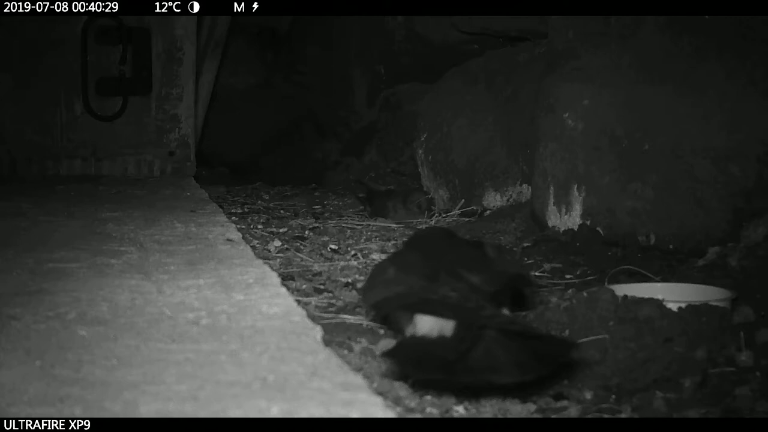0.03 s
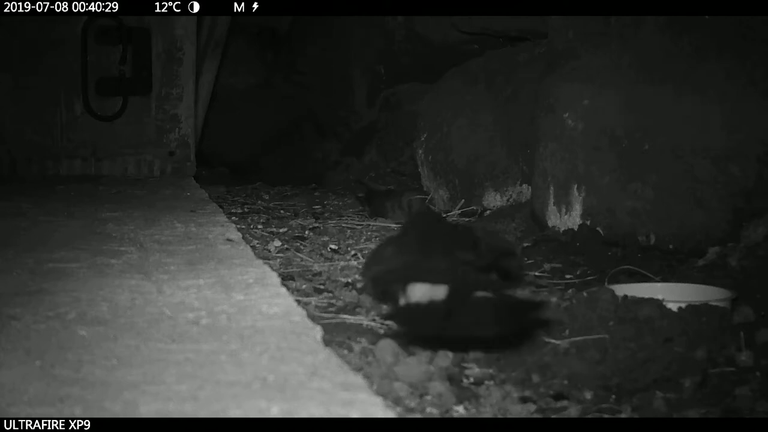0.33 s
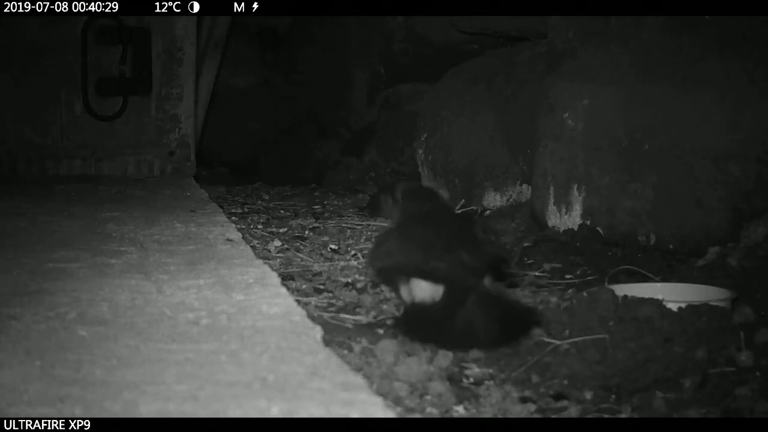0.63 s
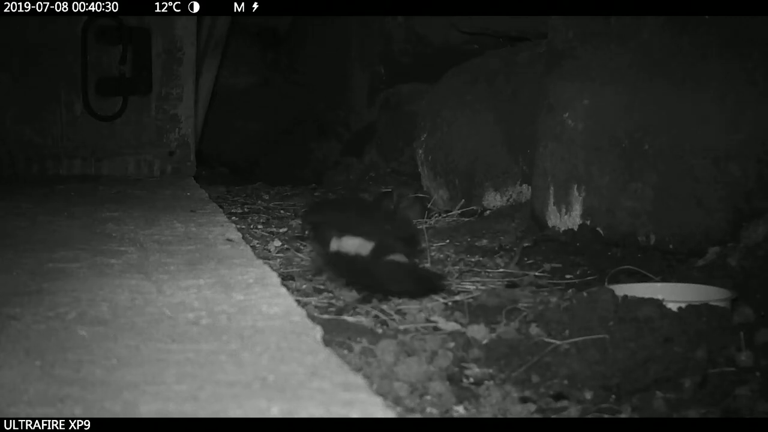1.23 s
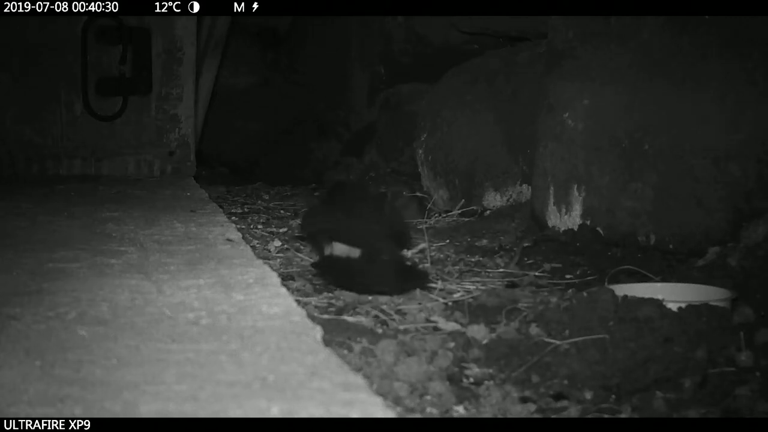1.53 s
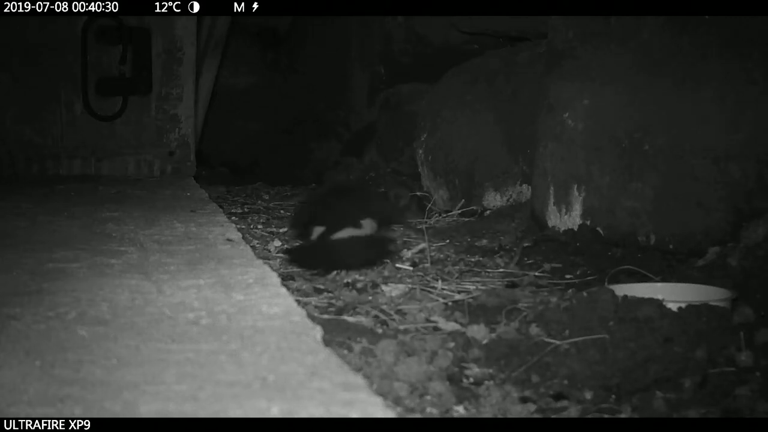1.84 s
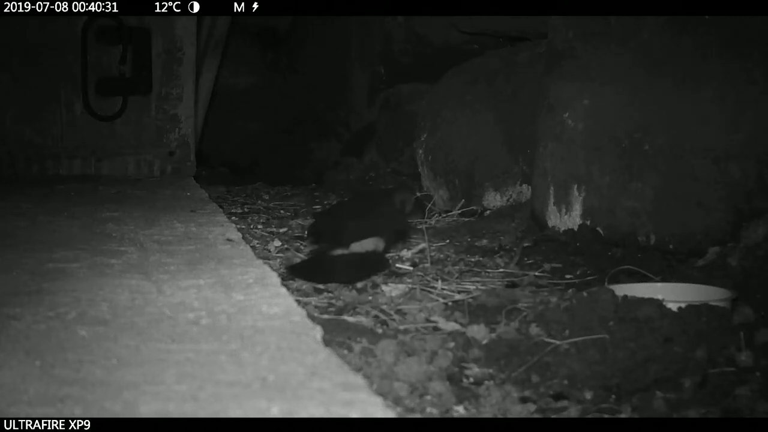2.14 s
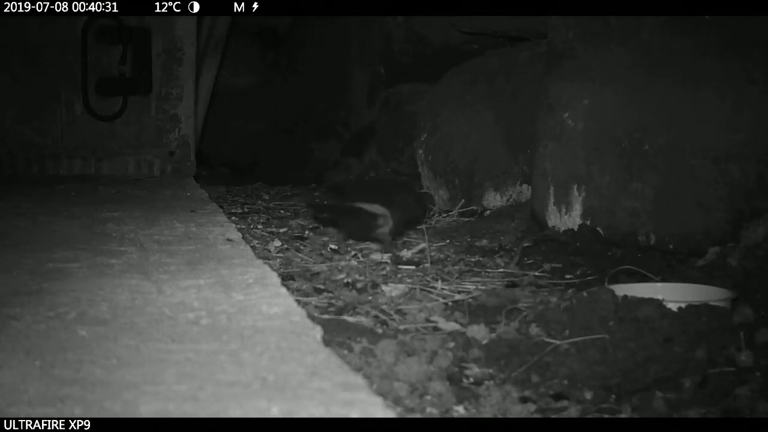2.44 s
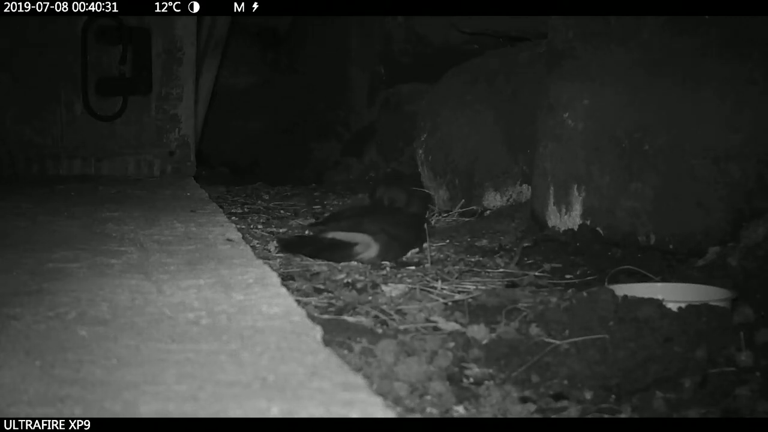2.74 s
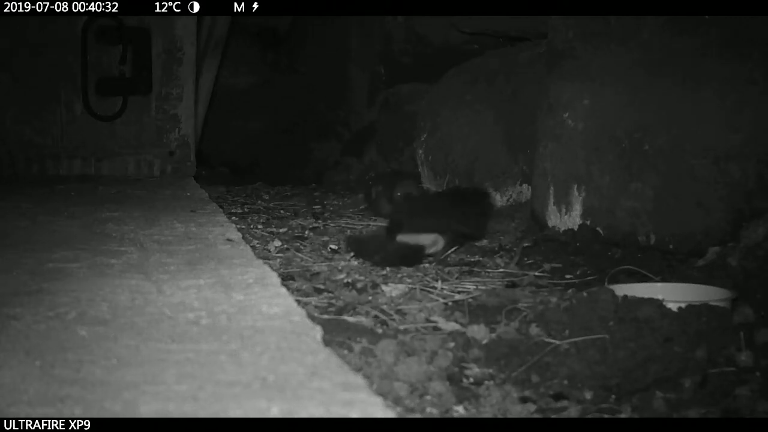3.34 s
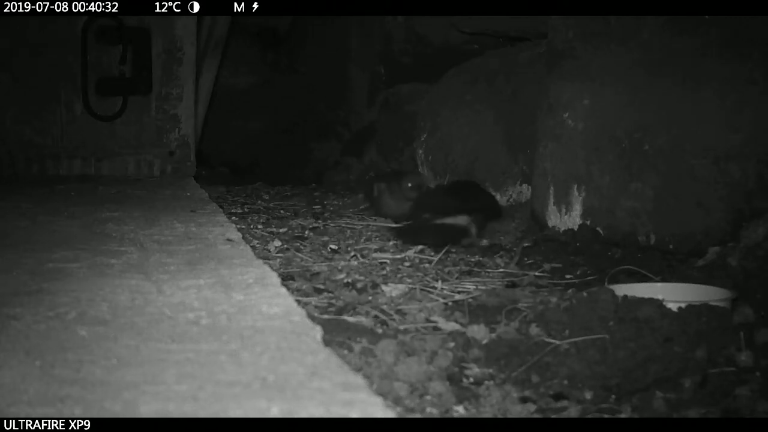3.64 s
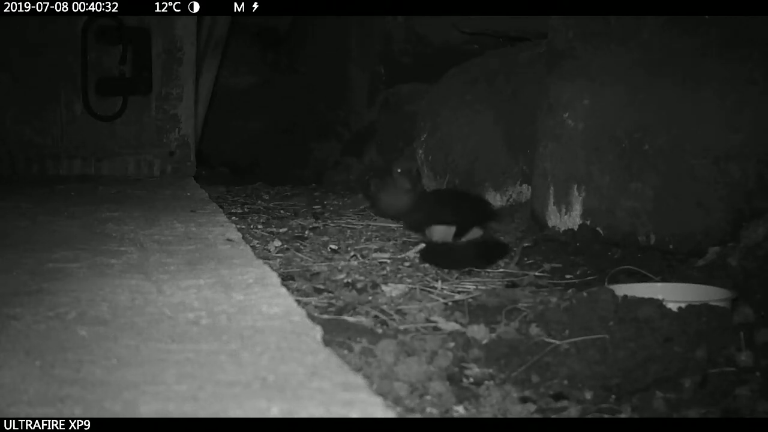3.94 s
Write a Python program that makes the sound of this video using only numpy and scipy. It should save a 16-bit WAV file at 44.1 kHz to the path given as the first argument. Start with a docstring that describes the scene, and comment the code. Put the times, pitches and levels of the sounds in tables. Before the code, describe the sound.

A seabird purrs in a rapid trill a few steps away, starting almost at once. At about 0.9, 2.4 and 3.9 seconds the purr ends in a hiccup, a clean squeak breaking into a low wheeze, and resumes straight after the first two. A second bird wheezes faintly near 1.2 and 3.8 seconds. A stone wall adds a short echo over steady faint hiss and soft low bumps.

```python
"""A storm petrel purrs on the ground by a stone wall at night, a few steps away.
Each purr is a run of tiny notes, each a quick arch of pitch, pulsed by the syrinx and rung in the throat.
It ends in a hiccup: a clean squeak that breaks into a low, falling wheeze.
A second bird wheezes further off. The stones give a short echo over hiss and soft low bumps."""
import sys
import numpy as np
from scipy import signal
from scipy.fft import rfft, irfft
from scipy.io import wavfile
from scipy.ndimage import uniform_filter1d

SR = 44100
rng = np.random.default_rng(int(sys.argv[2]) if len(sys.argv) > 2 else 0)


def store_pcm(level_fs):
    """Save levels as 16-bit WAV."""
    pcm = np.round(np.clip(level_fs, -1, 1) * 32767).astype(np.int16)
    wavfile.write(sys.argv[1], SR, np.atleast_2d(pcm).T)


N = 176400
T = np.arange(N) / SR


def amp(db):
    """Decibels to gain."""
    return 10 ** (np.asarray(db) / 20)


def unit(x):
    """Scale to an rms of 1."""
    return x / np.sqrt(np.mean(x ** 2))


def curves(rows, t):
    """Read a table as automation: the first column is time, each other one a curve at times t."""
    rows = np.array(rows, float)
    return [np.interp(t, rows[:, 0], column) for column in rows.T[1:]]


def span(rows, fade_s=0.0018):
    """The samples that a table covers, and a gate with soft edges."""
    start_s, end_s = rows[0][0], rows[-1][0]
    at = (T > start_s) & (T < end_s)
    return at, np.clip(np.minimum(T[at] - start_s, end_s - T[at]) / fade_s, 0, 1)


def colour(x, points):
    """EQ through a list of (freq_hz, gain_db) points."""
    hz, db = np.array(points, float).T
    bins_hz = np.maximum(np.fft.rfftfreq(x.shape[-1], 1 / SR), 1)
    return irfft(rfft(x) * amp(np.interp(np.log(bins_hz), np.log(hz), db)), x.shape[-1])


def resonate(x, hz, width_hz):
    """A steep resonance: one band-pass applied twice."""
    b, a = signal.iirpeak(hz, hz / width_hz, fs=SR)
    return signal.lfilter(b, a, signal.lfilter(b, a, x))


def background(bed_db=-45.5, side_db=-3, bump_hz=71.95, bump_half_s=0.056):
    """A wide, steady bed of hiss and rumble, with a few soft low bumps."""
    # tone of the bed: freq_hz, gain_db
    bed_eq = [(20, 6.5), (40, -2.5), (75, 3.5), (130, -2.5), (250, -8), (500, -10), (1000, -3.5),
              (2500, -10), (4500, -20), (6800, -33), (8200, -23), (10000, -22.5), (11500, -31),
              (15500, -29.5)]
    # low bumps: peak_s, level_db
    bump_cues = [(0.741, -56), (2.028, -60), (2.27, -57), (2.70, -50.5), (2.861, -53), (2.959, -50.5)]
    mid, side = (unit(colour(noise, bed_eq)) for noise in rng.standard_normal((2, N)))
    bed = amp(bed_db) * (mid + amp(side_db) * side * np.array([[1], [-1]]))
    bumps = np.zeros(N)
    for peak_s, db in bump_cues:
        swell = amp(db) * np.exp(-((T - peak_s) / bump_half_s) ** 2)
        bumps += swell * np.sin(2 * np.pi * bump_hz * (T - peak_s))
    return bed + np.sqrt(2) * bumps


def stone_echo(near, far, t60_s=0.17, build_s=0.004):
    """The near bird sounds direct and echoes briefly off the stones; the far one is echo alone."""
    # tone of the near bird's echo: freq_hz, gain_db
    send_eq = [(200, 4), (600, -13), (1100, -9.5), (2200, -12.5), (3500, -17), (5000, -10.5), (6500, -1),
               (10000, -8.5), (15000, -22)]
    # stereo width of the echo, widest in the treble: freq_hz, side_minus_mid_db
    width_eq = [(300, -3.5), (700, -19), (2300, -2.5), (4000, 11), (6500, 0.5), (15000, 20.5)]
    # the near bird's place: time_s, left_minus_right_db
    pan = [(.2, -1.0), (1.2, .6), (2.7, 1.9), (3.3, 1.5), (3.9, .4)]
    t = T[:SR // 2]
    envelope = amp(-60 * t / t60_s) * np.minimum(t / build_s, 1)
    tails = np.array([unit(noise * envelope) for noise in rng.standard_normal((2, len(t)))])
    send = colour(near, send_eq) + far
    mid, side = signal.fftconvolve(send[None], tails / np.sqrt(len(t)), axes=1)[:, :N]
    pan_db, = curves(pan, T)
    direct = near * amp(np.array([pan_db, -pan_db]) / 2)
    return direct + mid + colour(side, width_eq) * np.array([[1], [-1]])


def syrinx(hz, jitter, shimmer_db, breath):
    """The bird's voice source: a pulse per cycle, each with its own length, size and puff of air."""
    cycle = np.cumsum(hz / SR).astype(int)
    pitch_draw, level_draw = rng.standard_normal((len(hz), 2)).T
    hz = hz * np.exp(jitter * pitch_draw[cycle])
    turns = np.cumsum(hz / SR)
    phase = turns % 1 - .5
    from_pulse = phase * SR / hz  # in samples
    pulses = np.sinc(from_pulse) * np.exp(-(from_pulse / 4) ** 2)
    pulses *= amp(shimmer_db * level_draw[turns.astype(int)])
    puffs = rng.standard_normal(len(hz)) * np.cos(np.pi * phase) ** 2
    return unit(pulses - hz / SR) + breath * unit(puffs)


def throat(source, levels_db, t, window=3600):
    """The source rings five formants, a low ring and a faint top rasp, each held to its own level."""
    # throat resonances: centre_hz, width_hz
    formants = [(1060, 945), (1600, 560), (2280, 646), (3250, 1540), (6500, 1600)]
    # the ring below the formants: time_s, level_db
    low_ring = [(.1, -53), (.85, -70), (.97, -51), (1.15, -50), (1.8, -43.5), (2.4, -43), (2.5, -39),
                (2.65, -50.5), (2.9, -49.5), (3.5, -64), (3.96, -50)]
    low_band_hz, rasp_band_hz = (745, 425), (9630, 4100)  # centre, width
    low = (low_band_hz, curves(low_ring, t)[0])
    rasp = (rasp_band_hz, levels_db[-1] - 7)
    out = 0
    for k, ((hz, width_hz), db) in enumerate([low, *zip(formants, levels_db), rasp]):
        ring = resonate(source, hz, width_hz)
        power = uniform_filter1d(uniform_filter1d(ring ** 2, window), window // 2)
        polarity = (-1) ** k
        out = out + polarity * amp(db) * ring / np.sqrt(np.abs(power) + 1e-12)
    return out


def far_bird(gain_db=-32.5):
    """Fainter, arching wheezes from a second bird."""
    # one table per wheeze: time_s, pitch_hz, relative_db
    calls = [
        [(1.11, 326.3, -3.5), (1.16, 339, -9.5), (1.22, 338.4, -11), (1.28, 324.6, -9), (1.38, 289.7, -15)],
        [(3.72, 366.2, -16), (3.79, 409.3, -12.5), (3.83, 392.6, -15), (3.87, 362, -5.5), (3.94, 328, -5)],
    ]
    # tone of the distant voice: freq_hz, gain_db
    voice_eq = [(200, -8), (350, -12), (700, -8), (1050, -2.5), (1700, 0), (2500, -25.5), (4500, -44),
                (5600, -44), (6500, -10.5), (7600, -43), (15000, -49)]
    out = np.zeros(N)
    for rows in calls:
        at, gate = span(rows)
        hz, db = curves(rows, T[at])
        buzz = syrinx(hz, jitter=0.012, shimmer_db=1.5, breath=0.25)
        out[at] += gate * amp(db + gain_db) * unit(colour(buzz, voice_eq))
    return out


def wheezes(gain_db=-2, air_over_top_formant_db=3):
    """The squeak breaks into a low buzz that sinks and frays, with a thin hiss of air."""
    # one table per wheeze: time_s, pitch_hz, jitter_ratio, relative_db of each of the five formants
    calls = [
        [(.945, 392.3, 0.047, -49, -31, -40, -40, -48), (.965, 361.6, .04, -28.5, -22.5, -38, -43, -51.5),
         (.985, 357.2, 0.014, -52, -24, -36, -44, -53), (1.005, 368.5, 0.0059, -34, -30, -35, -50, -54),
         (1.028, 317.5, 0.0038, -37.5, -30.5, -40, -50, -52), (1.048, 318.5, 0.007, -32.5, -29, -39, -48, -52),
         (1.075, 303.4, 0.011, -49, -29, -40, -51, -56), (1.098, 295.3, 0.032, -52, -31.5, -48, -47, -57),
         (1.116, 280, 0.079, -29.5, -38, -37, -57, -56)],
        [(2.459, 369, 0.062, -42, -42, -35, -53, -60), (2.478, 369, 0.047, -46, -30, -33, -44, -56),
         (2.502, 354, 0.025, -54, -39, -35.5, -48, -54), (2.522, 331, 0.0077, -39, -34, -36, -54, -58),
         (2.552, 312, .008, -43, -37, -35, -55, -56), (2.565, 303.6, 0.067, -48, -44, -41.5, -56, -62),
         (2.605, 282.7, 0.063, -63, -38.5, -39, -58, -59.5), (2.622, 266, 0.068, -58, -43, -48, -64, -68)],
        [(3.937, 362, 0.043, -29, -29, -38, -36, -47), (3.958, 353, .005, -38, -22, -66, -62, -56),
         (3.975, 344.4, .005, -35, -24.5, -60, -66.5, -68), (3.99, 361, .005, -35, -27, -61, -53, -54),
         (4.01, 358, .005, -43, -23, -44, -55, -47)],
    ]
    out = np.zeros(N)
    for rows in calls:
        at, gate = span(rows)
        hz, jitter, *levels_db = curves(rows, T[at])
        buzz = throat(syrinx(hz, jitter, shimmer_db=-3, breath=0.39), levels_db, T[at])
        air = unit(resonate(rng.standard_normal(len(hz)), hz=6400, width_hz=1300))
        out[at] += gate * (buzz + amp(levels_db[-1] + air_over_top_formant_db) * air)
    return out * amp(gain_db)


def squeaks(quiver_depth=0.0025, quiver_cutoff_hz=350):
    """The last note of a purr is held as a nearly clean tone."""
    # one table per squeak: time_s, pitch_hz, fundamental_db, octave_db
    calls = [
        [(.887, 1253, -29, -37), (.897, 1227, -33, -29), (.905, 1166, -27.5, -32), (.922, 1170, -29, -42),
         (.937, 1155, -28, -37), (.949, 1137, -25, -36)],
        [(2.411, 1072, -30, -28), (2.418, 1170, -47, -29), (2.427, 1219, -46, -32), (2.437, 1214, -32.5, -29.5),
         (2.452, 1193, -49, -36), (2.463, 1138, -31, -28)],
        [(3.893, 1225, -27, -34), (3.908, 1280, -27, -43), (3.921, 1220, -23.5, -37), (3.929, 1209, -38, -35.5),
         (3.943, 1190, -27, -46)],
    ]
    # steady upper partials: harmonic_number, level_db
    overtones = [(3, -48.5), (4, -57), (5, -50), (6, -52.5), (7, -63.5), (8, -65)]
    lowpass = signal.butter(2, quiver_cutoff_hz, fs=SR, output="sos")
    quiver = unit(signal.sosfilt(lowpass, rng.standard_normal(N)))
    out = np.zeros(N)
    for rows in calls:
        at, gate = span(rows)
        hz, fundamental_db, octave_db = curves(rows, T[at])
        phase = 2 * np.pi * np.cumsum(hz * (1 + quiver_depth * quiver[at])) / SR
        partials = [(1, fundamental_db), (2, octave_db), *overtones]
        out[at] += np.sqrt(2) * gate * sum(amp(db) * np.sin(k * phase) for k, db in partials)
    return out


def purrs(gain_db=-1.5):
    """Runs of short notes that slow down; in each the pitch arches and the level swells, then stops."""
    # pace of the notes, one table per purr: time_s, notes_per_s
    tempos = [
        [(.104, 38.9), (.3, 37.55), (.55, 35.87), (.78, 33.98), (.878, 32.58)],
        [(1.138, 41.19), (1.25, 40.0), (1.55, 38.76), (2.0, 36.06), (2.3, 33.67), (2.405, 28.51)],
        [(2.641, 42.03), (2.75, 40.23), (3.1, 39.15), (3.45, 36.38), (3.78, 34.64), (3.892, 29.76)],
    ]
    # one table per purr: time_s, top_pitch_hz, edge_sag_octaves, relative_db of each of the five formants
    calls = [
        [(.12, 1073, 0.38, -36, -40.5, -33.5, -60, -58.5), (.26, 1086, 0.51, -35, -35.5, -31, -55, -54.5),
         (.48, 1141, 0.73, -37.5, -35.5, -33, -49.5, -58.5), (.68, 1205, 0.97, -39, -35, -35.5, -50.5, -57.5),
         (.86, 1285, 0.96, -38, -35, -36, -47.5, -54.5)],
        [(1.15, 1267, 0.6, -43, -52, -36, -47, -55.5), (1.32, 1146, 0.39, -44.5, -42.5, -36, -48, -57.5),
         (1.45, 1098, 0.33, -41.5, -44, -35, -48, -57), (1.6, 1064, 0.37, -50, -41, -38.5, -49, -60.5),
         (1.8, 1122, 0.48, -55, -37, -34.5, -47.5, -58), (2.08, 1230, 0.46, -46, -38, -32, -46.5, -56.5),
         (2.25, 1262, 0.53, -95, -38.5, -35, -50.5, -60.5), (2.39, 1304, 0.54, -68, -36, -34.5, -46.5, -55.5)],
        [(2.65, 938, 0.39, -47, -71, -39.5, -59, -66), (2.72, 897, .35, -64, -93, -39.5, -54, -67),
         (3.0, 962, .35, -48, -84, -39, -60, -66.5), (3.2, 1029, 0.6, -41.5, -51, -42, -54.5, -62),
         (3.38, 1070, .6, -40, -37.5, -47, -54, -61), (3.48, 1094, 0.61, -37, -34.5, -40.5, -81, -61.5),
         (3.72, 1247, 0.88, -40.5, -35.5, -39, -55, -60.5), (3.88, 1293, 0.53, -38.5, -32, -41.5, -52, -58.5)],
    ]
    lead_s, end_s = 0.0089, 0.0043  # a note sounds from before its centre to just after it
    attack_s, release_s, swell_db_per_s = 0.0011, 0.0014, 514
    arch_lead_s, arch_half_s = .0015, 0.006  # the pitch peaks just before the centre
    pitch_scatter, level_scatter_db, arch_scatter_s = .03, 1.1, .0011
    steady_jitter, onset_jitter, settle_s = .045, .11, .006  # a note starts ragged, then steadies
    out = np.zeros(N)
    for tempo, rows in zip(tempos, calls):
        at, gate = span(tempo)
        notes_per_s, = curves(tempo, T[at])
        top_hz, sag_octaves, *levels_db = curves(rows, T[at])
        count = np.cumsum(notes_per_s) / SR
        note_s = (count % 1 - .5) / notes_per_s  # zero at each note's centre
        pitch_draw, level_draw, arch_draw = rng.standard_normal((len(count), 3))[count.astype(int)].T
        from_top_s = note_s + arch_lead_s + arch_scatter_s * arch_draw
        droop = np.minimum((from_top_s / arch_half_s) ** 2, 1)
        hz = top_hz * 2 ** (-sag_octaves * droop) * (1 + pitch_scatter * pitch_draw)
        attack = np.clip((note_s + lead_s) / attack_s, 0, 1)
        release = np.clip((end_s - note_s) / release_s, 0, 1)
        swell = amp(swell_db_per_s * note_s + level_scatter_db * level_draw)
        jitter = steady_jitter + onset_jitter * np.clip(-note_s / settle_s, 0, 1) ** 2
        notes = attack * release * swell * syrinx(hz, jitter, shimmer_db=1.1, breath=.09)
        out[at] += gate * throat(notes, levels_db, T[at])
    return out * amp(gain_db)


def scene():
    """Both birds by the wall, over the background."""
    near_bird = purrs() + squeaks() + wheezes()
    return stone_echo(near_bird, far_bird()) + background()


def record(dry):
    """A trail camera's microphone switches on just after the start, with a top cut and a slight offset."""
    switch_on_s, cutoff_hz, dc_offset = .107, 15300, -.0128
    lowpass = signal.ellip(10, .2, 70, cutoff_hz, fs=SR, output="sos")
    return signal.sosfilt(lowpass, dry * (T > switch_on_s)) + dc_offset


dry = scene()
out = record(dry)
store_pcm(out)
```